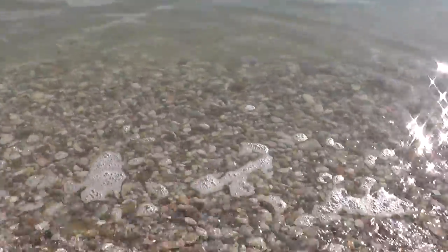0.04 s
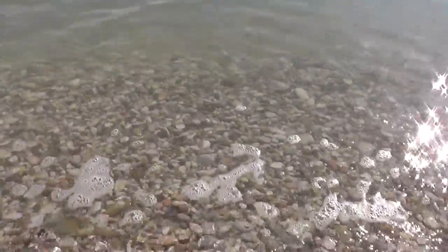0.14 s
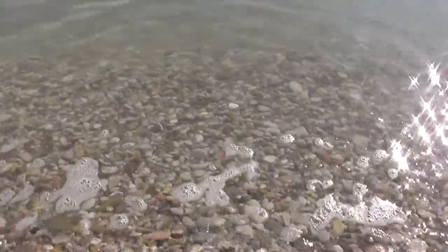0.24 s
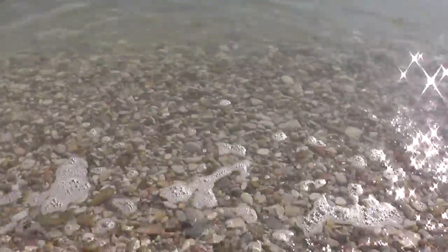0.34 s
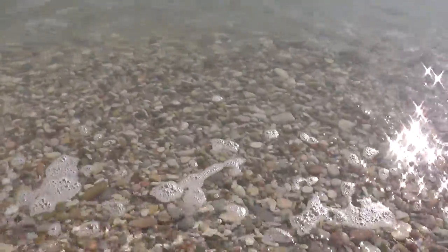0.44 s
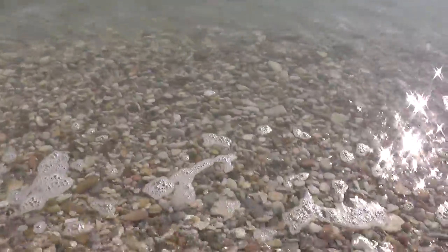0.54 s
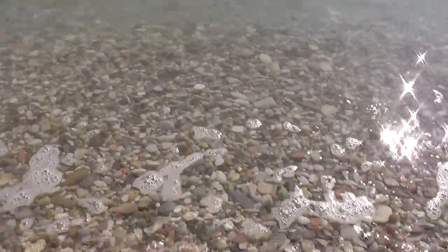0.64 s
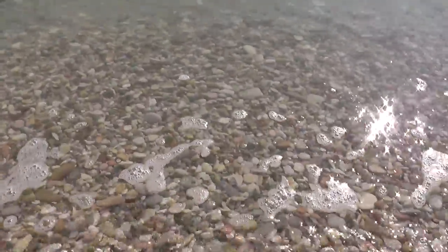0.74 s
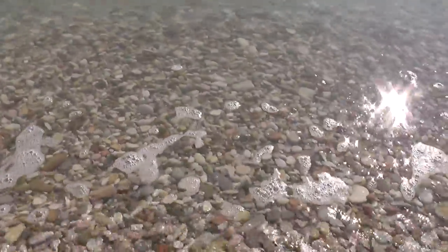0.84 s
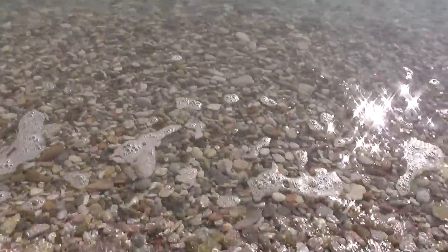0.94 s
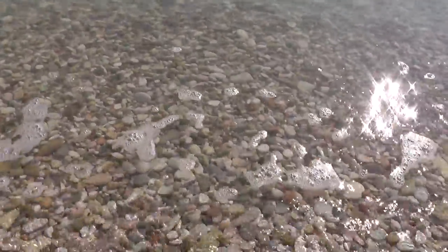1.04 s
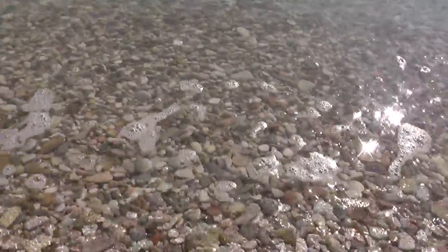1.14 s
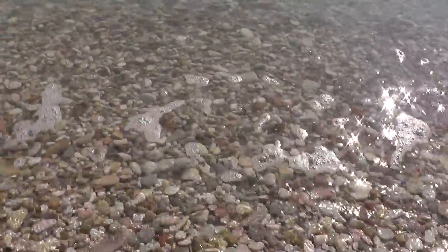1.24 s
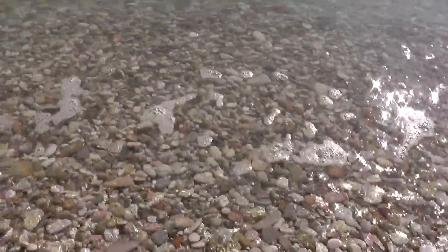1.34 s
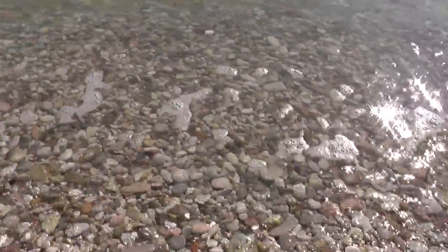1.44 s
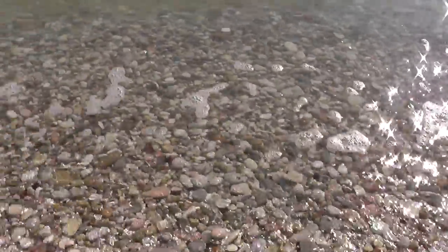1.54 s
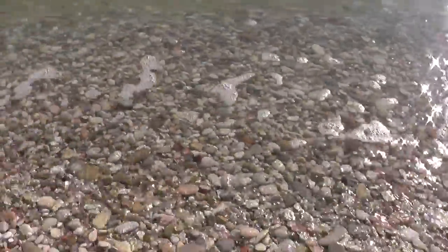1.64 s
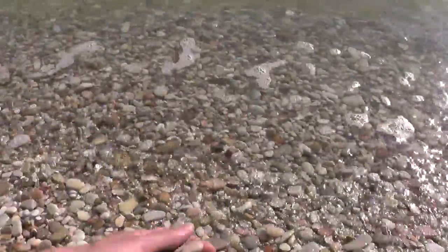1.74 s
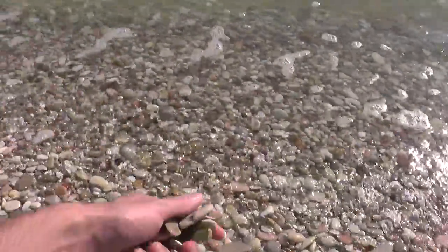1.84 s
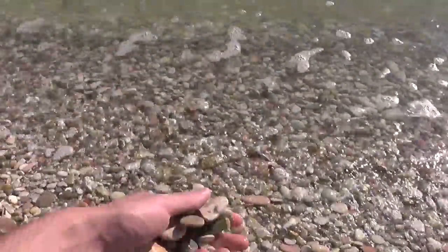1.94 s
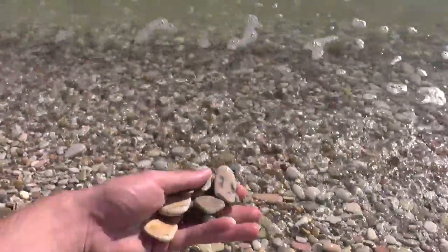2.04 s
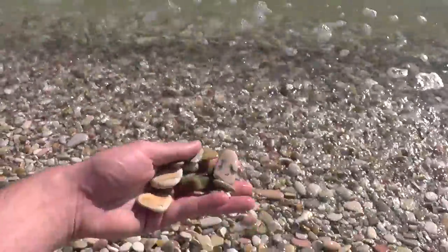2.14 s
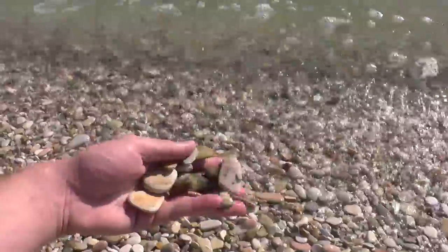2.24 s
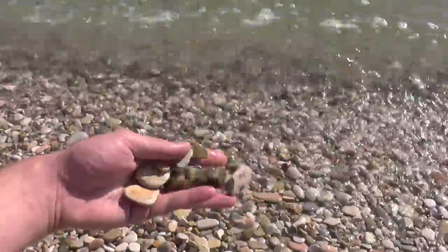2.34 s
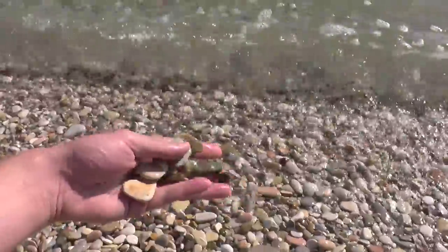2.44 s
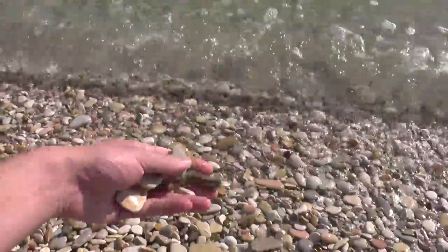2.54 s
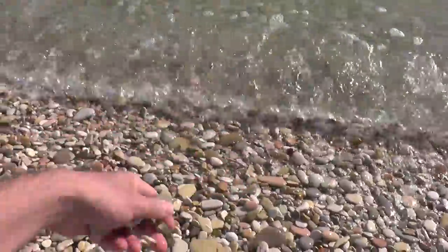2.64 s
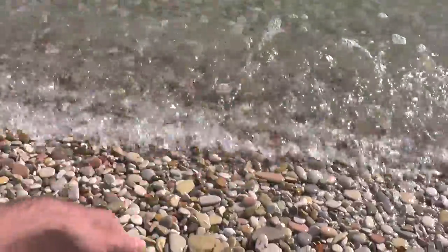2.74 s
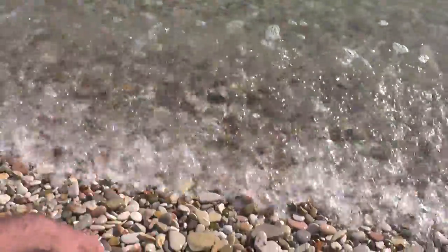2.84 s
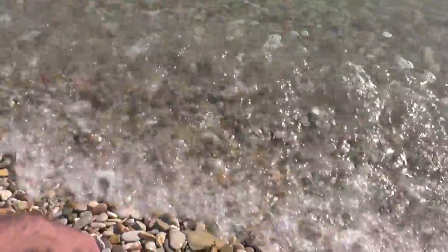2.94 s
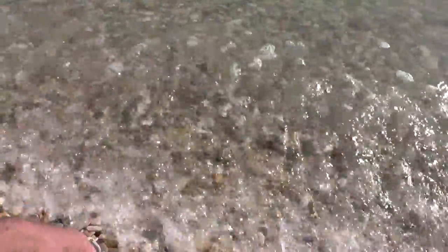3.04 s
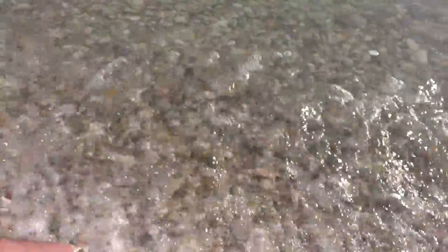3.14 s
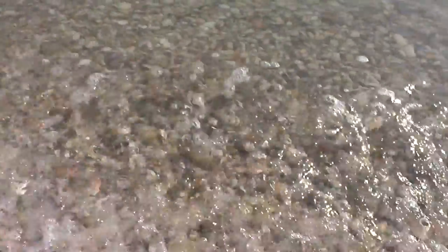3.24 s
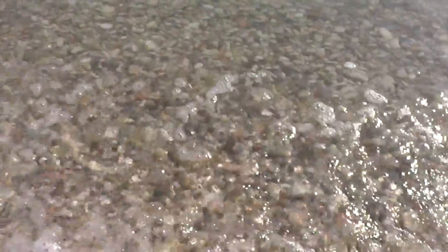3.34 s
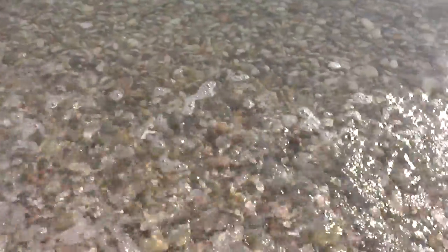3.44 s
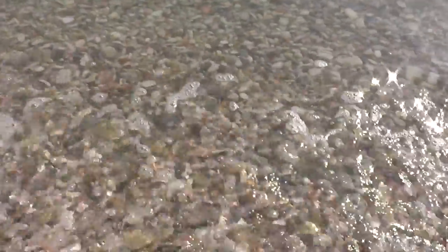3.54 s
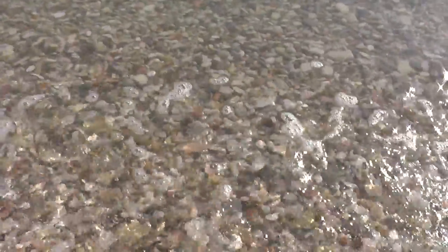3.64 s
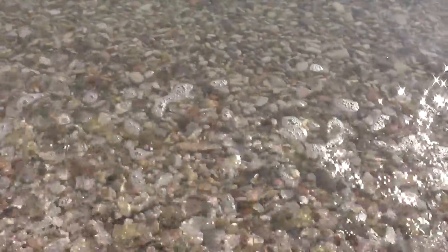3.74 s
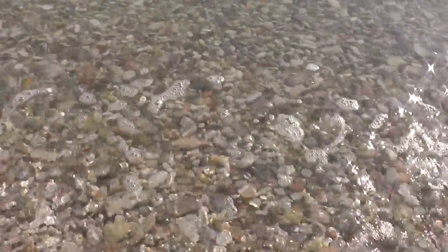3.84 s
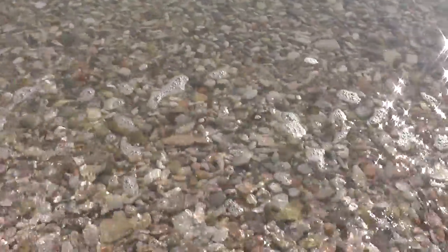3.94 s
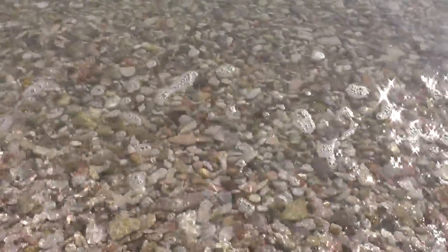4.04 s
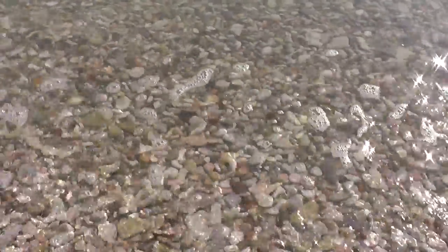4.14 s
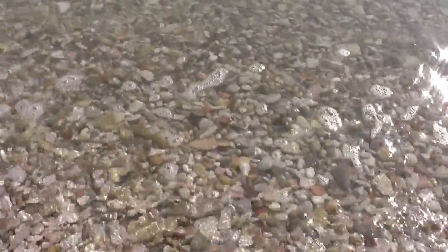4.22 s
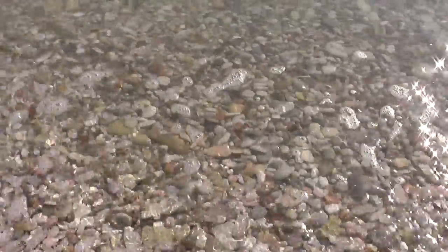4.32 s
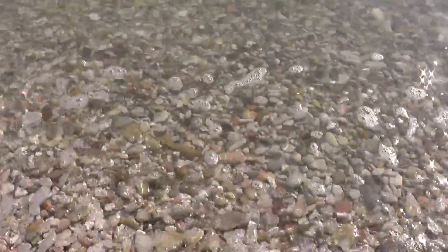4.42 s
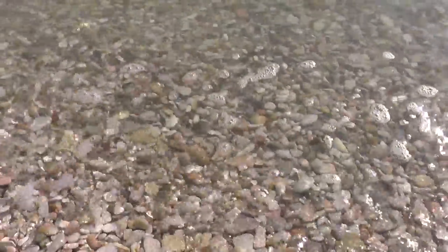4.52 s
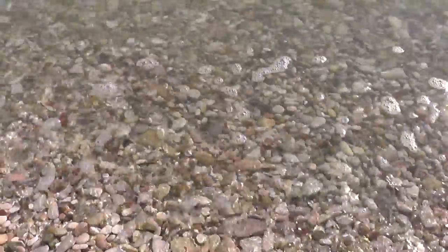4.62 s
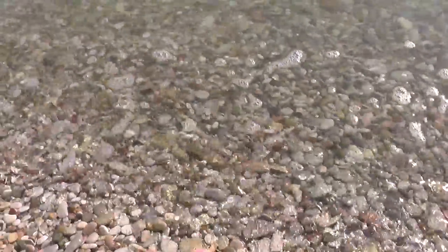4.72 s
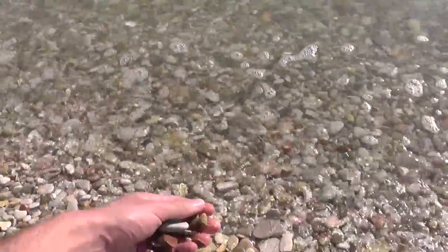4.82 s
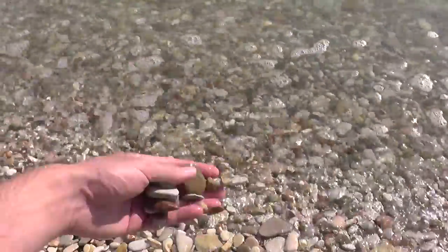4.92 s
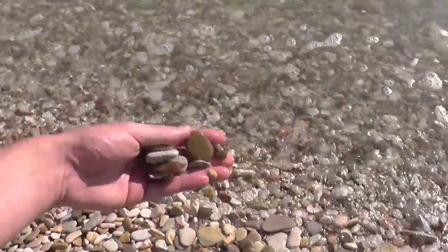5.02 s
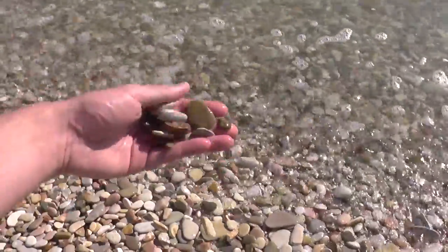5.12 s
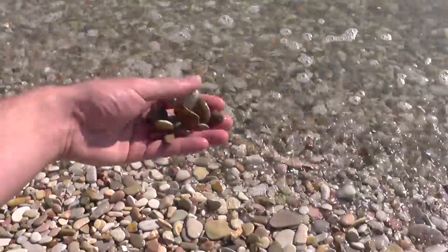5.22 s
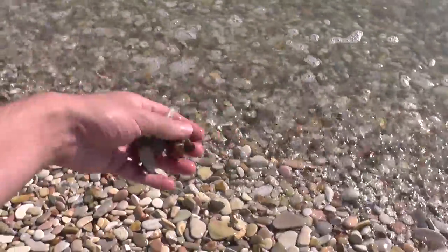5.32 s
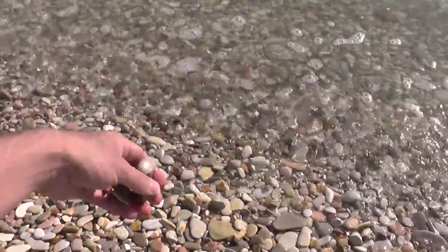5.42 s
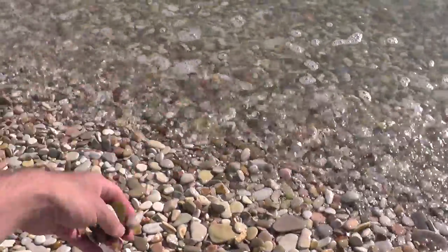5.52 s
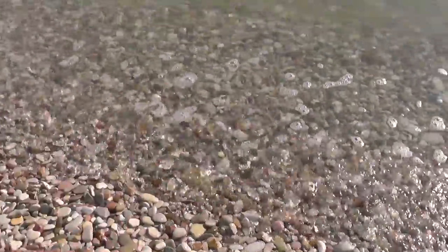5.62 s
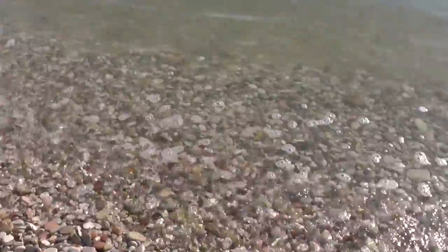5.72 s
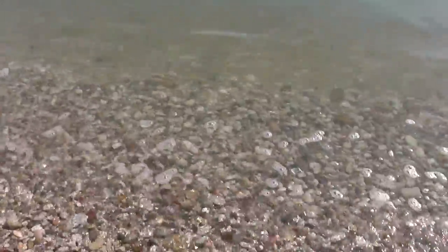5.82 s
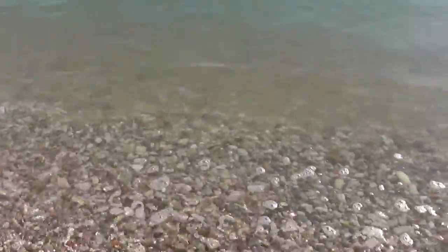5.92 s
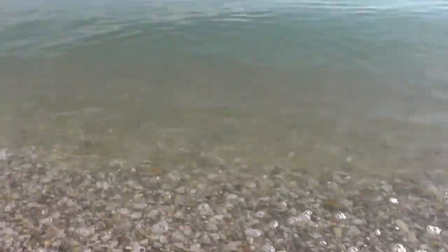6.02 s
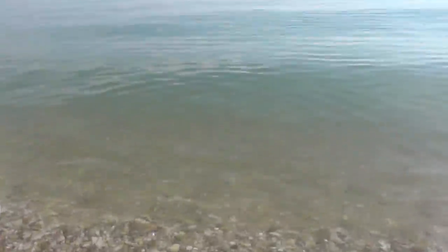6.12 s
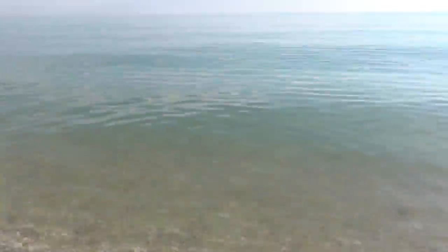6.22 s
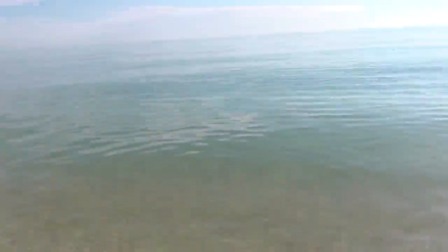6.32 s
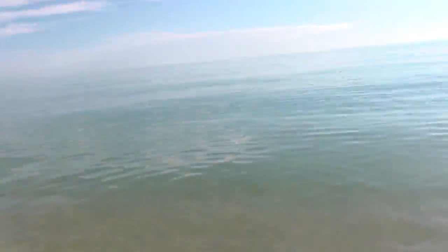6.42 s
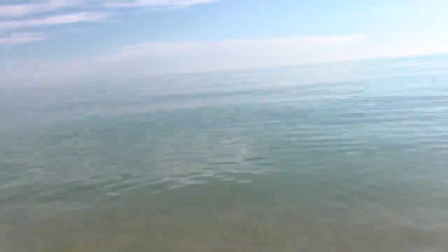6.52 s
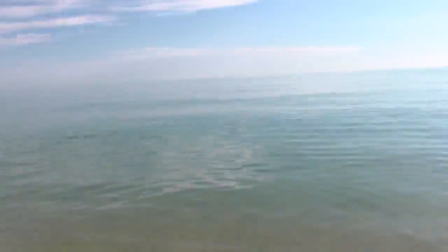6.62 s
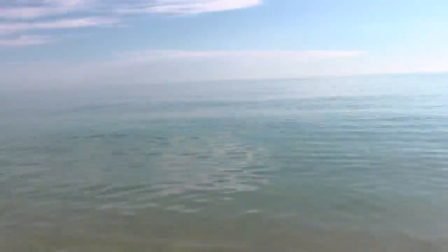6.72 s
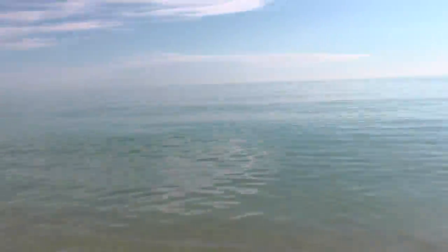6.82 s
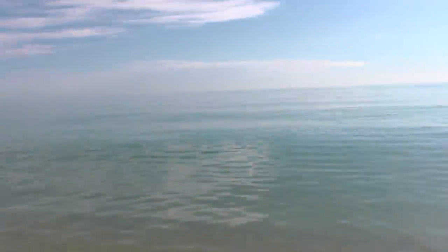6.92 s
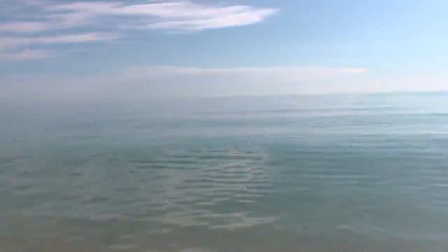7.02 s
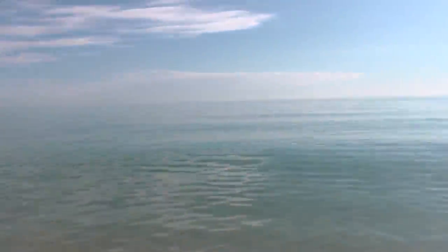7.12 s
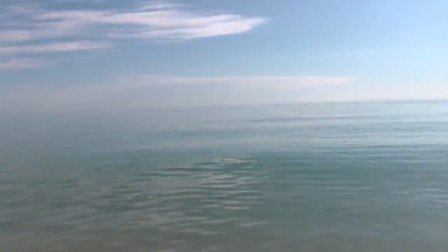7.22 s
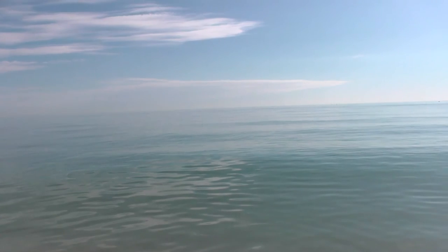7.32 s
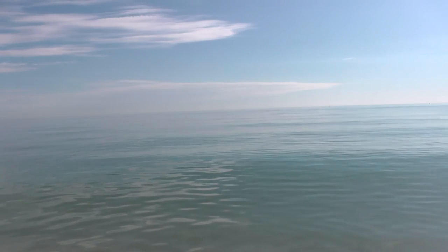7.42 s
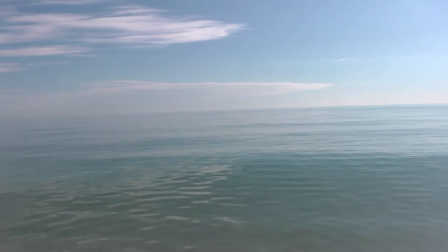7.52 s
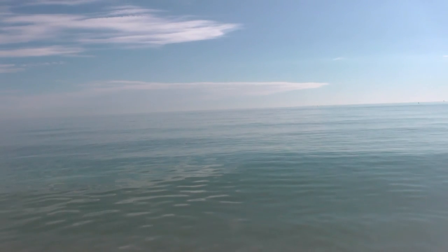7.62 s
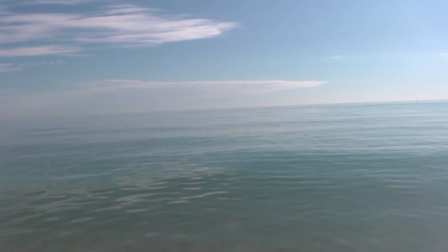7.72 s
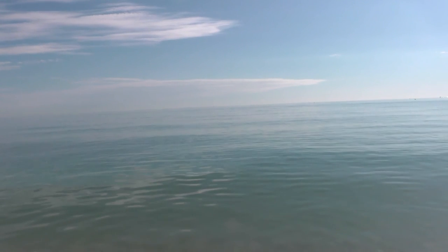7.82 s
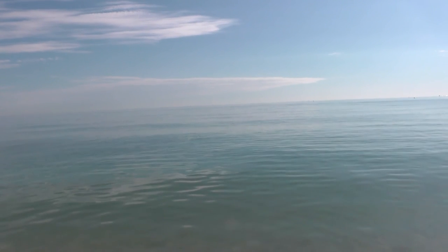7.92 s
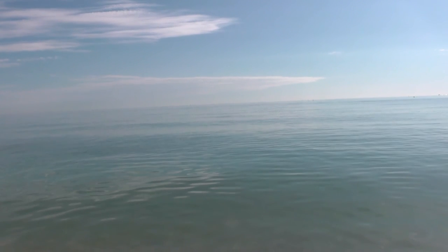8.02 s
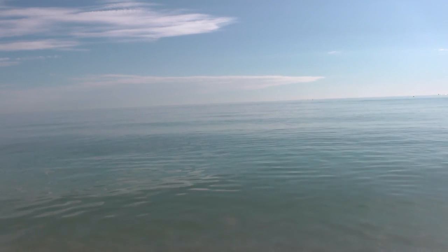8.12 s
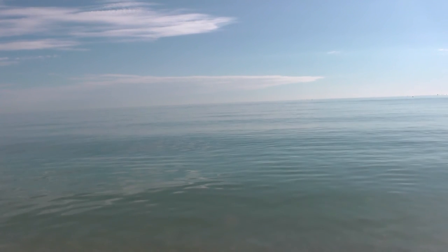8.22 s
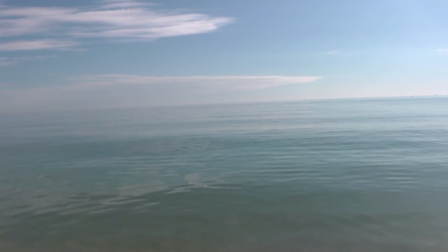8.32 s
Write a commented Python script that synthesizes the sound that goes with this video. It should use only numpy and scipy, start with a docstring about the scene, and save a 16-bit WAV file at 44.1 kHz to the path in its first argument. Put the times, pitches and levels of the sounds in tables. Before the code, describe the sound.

Small waves lap a pebble shore while handled stones crunch, click and trickle close by, followed by a lull and two splashy wavelets.

```python
"""Pebble beach with a digging hand

Small waves gulp, wash up in a cloud of rising bubbles and fade, over a steady low shore and breeze.
Close by, a hand stirs wet shingle: dense ticks slide, stones clack as damped rings, water drains between.
After a lull two last waves break in quick succession, the first to the left, the second right of centre.
Bubbles are short damped sines laid over filtered noise; contacts are noise bursts and ringing modes."""
import sys
import numpy as np
from scipy import signal
from scipy.fft import rfft, irfft, next_fast_len
from scipy.io import wavfile
from scipy.ndimage import map_coordinates

SR = 44100
rng = np.random.default_rng(int(sys.argv[2]) if len(sys.argv) > 2 else 0)


def int16_out(signal):
    """Quantize to a 16-bit WAV file."""
    q = np.round(np.clip(np.atleast_2d(signal).T, -1, 1) * 32767)
    wavfile.write(sys.argv[1], SR, q.astype(np.int16))


N = 368676
TOP_HZ = 16600  # upper band limit


def amp(db):
    """Decibels to gain."""
    return 10 ** (np.asarray(db) / 20)


def unit(x):
    """Scale to rms 1."""
    return x / np.sqrt(np.mean(x ** 2) + 1e-20)


def along(points, hz):
    """Read (Hz, value) points on a log frequency axis."""
    f, v = np.transpose(points)
    return np.interp(np.log(hz + 1), np.log(f + 1), v)


def curve(rows):
    """Join (seconds, value) rows into one value per sample."""
    s, value = np.transpose(rows)
    return np.interp(np.arange(N) / SR, s, value)


def wobble(rate):
    """A smooth random curve with rate knots a second."""
    knots = rng.standard_normal(int(N * rate / SR) + 4)
    return map_coordinates(knots, [np.arange(N) * rate / SR])


def filtered(x, response):
    """Multiply the spectrum of x by a response of frequency."""
    m = next_fast_len(N + 8192)
    return irfft(rfft(x, m) * response(np.fft.rfftfreq(m, 1 / SR)), m)[..., :N]


def coloured(x, spectrum, size=2048):
    """Minimum-phase filter: nothing sounds before its cause, so attacks stay sharp."""
    cepstrum = irfft(np.log(amp(along(spectrum, np.fft.rfftfreq(size, 1 / SR)))))
    # fold the cepstrum onto positive time
    cepstrum[1:size // 2] *= 2
    cepstrum[size // 2 + 1:] = 0
    impulse = irfft(np.exp(rfft(cepstrum)))
    return signal.oaconvolve(x, impulse[None], axes=1)[:, :N]


def spread(pair, alike):
    """Mix two unrelated signals into left and right of a given likeness."""
    def turn(hz):
        return np.arccos(np.clip(along(alike, hz), -1, 1)) / 2

    mid, side = filtered(pair, lambda hz: np.array([np.cos(turn(hz)), np.sin(turn(hz))]))
    return unit(np.array([mid + side, mid - side]))


def add(track, s, sound):
    """Mix a sound into a track at s seconds."""
    part = track[..., max(round(s * SR), 0):][..., :sound.shape[-1]]
    part += sound[..., :part.shape[-1]]


def grains(count, hz, scatter, cycles, size_db, rise, size):
    """Damped rings at random times, -60 dB after the given cycles; a middle and a side channel."""
    start = rng.integers(0, N, (count, 1))
    pitch = np.minimum(hz * np.exp(scatter * rng.standard_normal((count, 1))), SR / 3)
    strength = amp(size_db * np.minimum(rng.exponential(size=(count, 1)), 4))
    turns = pitch * np.arange(size) / SR
    age = turns / cycles
    ring = strength * amp(-60 * np.minimum(age, 2)) * np.sin(2 * np.pi * turns * (1 + rise * age))
    at = (start + np.arange(size)).ravel()
    sides = (1, rng.standard_normal((count, 1)))  # each ring gets its own direction
    return np.array([unit(np.bincount(at, (ring * side).ravel(), N)[:N]) for side in sides])


def cloud(rings, blur_db, spectrum, alike):
    """Near grains over the noise blur of countless far ones."""
    blurred = rings + amp(blur_db) * rng.standard_normal((2, N))
    return spread(coloured(blurred, spectrum), alike)


def contacts(rate, size_db, t60, size=500):
    """Sudden noise bursts, rate a second, dying in milliseconds: many faint, a few strong."""
    strength = amp(size_db * np.minimum(rng.exponential(size=N), 2.5))
    power = (rng.random(N) < rate / SR) * strength ** 2 / rate
    decay = amp(-120 * np.arange(size) / SR / t60)  # power falls 60 dB in t60
    envelope = np.sqrt(np.abs(signal.oaconvolve(power, decay)[:N]))
    return unit(envelope * rng.standard_normal((2, N)))


def swell(s, rise, hold, fade):
    """Gain that rises from time s, holds, then fades by so many dB a second."""
    t = np.arange(N) / SR - s
    return np.clip(t / rise, 0, 1) * amp(-fade * np.maximum(t - rise - hold, 0))


def together(gains):
    """Unrelated sounds add in power."""
    return np.sqrt(sum(g ** 2 for g in gains))


# Small waves on the pebbles; gulp, wash and spray get a common trim each when mixed.
# Each row: break in seconds, hold in seconds, wash fade in dB per second, gulp, wash and spray
# levels in dB before trim, left minus right in dB, gulp pitch as a ratio at the break.
WAVES = [(-0.15, 0.45, 23, -43, -36, -43.5, -5, 0.88), (0.39, 0.19, 55, -39.5, -38.5, -66, -4.5, 0.86),
         (1.129, 0.048, 22, -53, -49.5, -64, 1, 0.92), (1.9, 0.019, 40, -45, -49.5, -40.5, 0, 0.67),
         (2.402, 0.21, 28, -47.5, -48, -69, 0, 1.1), (2.702, 0.2, 45, -42.5, -36, -44, -1.5, 0.75),
         (2.905, 0.22, 21, -47.5, -36, -61, -6.5, 1), (3.469, 0.45, 36, -54, -42, -45.5, 2.5, 1),
         (4.745, 0.67, 56, -57, -57.5, -65, -2, 0.71), (7.145, 0.086, 8, -43.5, -36, -40, 6, 1.21),
         (7.531, 0.12, 21, -35.5, -29, -25, -2.5, 1.06)]
GULP_RISE_S, WASH_RISE_S, SPRAY_RISE_S = 0.073, .11, 0.16  # air pockets close first, foam and spray follow
GULP_HOLD_SHARE, GULP_FADE_DB_PER_S = 0.97, 21  # share of the wave's hold; slowest gulp fade
APPROACH_DB, APPROACH_DB_PER_S = -14.5, 19  # a wave murmurs ever louder before it breaks


def surf():
    """Left and right gains of gulp, wash and spray: each wave approaches, breaks, runs up and fades."""
    gulp, wash, spray = [], [], []
    for s, hold, fade, gulp_db, wash_db, spray_db, pan_db, _ in WAVES:
        ahead = s - np.arange(N) / SR
        approach = amp(APPROACH_DB - APPROACH_DB_PER_S * np.abs(ahead))
        approach = approach * np.clip(1 + ahead / WASH_RISE_S, 0, 1)
        gulp_fade = max(fade, GULP_FADE_DB_PER_S)
        gulp_swell = swell(s, GULP_RISE_S, GULP_HOLD_SHARE * hold, gulp_fade)
        wash_swell = swell(s, WASH_RISE_S, hold, fade)
        spray_swell = swell(s, SPRAY_RISE_S, hold, 1.3 * fade)
        sides = amp(pan_db * np.array([[.5], [-.5]]))
        gulp.append(sides * amp(gulp_db) * (1.92 * approach + gulp_swell))
        wash.append(sides * amp(wash_db) * (0.4 * approach + wash_swell))
        spray.append(sides * amp(spray_db) * (0.5 * approach + spray_swell))
    return together(gulp), together(wash), together(spray)


SHRINK_OCT_PER_S, SHRINK_FOR_S = 1.0, .42  # wash bubbles get smaller and higher; gulps rise half as fast
WASH_START_PITCH = .92  # ratio


def bubble_pitch():
    """Pitch ratios of gulp and wash: bubbles shrink as each wave runs up; the loudest wave leads."""
    weights, gulp, wash = [], [], []
    for s, hold, fade, _, wash_db, _, _, pitch in WAVES:
        shrink = 2 ** (SHRINK_OCT_PER_S * np.clip(np.arange(N) / SR - s, 0, SHRINK_FOR_S))
        power = (amp(wash_db) * swell(s, GULP_RISE_S, hold, fade)) ** 2
        weights.append(power + np.finfo(float).eps)
        gulp.append(pitch * np.sqrt(shrink))
        wash.append(WASH_START_PITCH * shrink)
    return np.average(gulp, axis=0, weights=weights), np.average(wash, axis=0, weights=weights)


def glide(pair, ratio):
    """Shift a texture in pitch by reading it at a speed that changes with time."""
    at = np.cumsum(ratio) % (N - 1)
    return np.array([map_coordinates(x, [at]) for x in pair])


# Colours of gulp, wash and spray. Each row: frequency in Hz, relative level in dB.
GULP_COLOUR = [(40, -40), (150, -11.5), (220, -2.5), (290, 1.5), (400, 1), (620, 6), (1500, -62.5)]
WASH_COLOUR = [(200, -36.5), (450, -11.5), (620, -3), (850, -4), (1300, -4), (1800, -2), (3000, -10),
               (7000, -49)]
SPRAY_COLOUR = [(1700, -6), (2300, -13.5), (2900, -5), (4500, -7.5), (5200, 0), (6500, 3), (7800, -9.5),
                (9500, 1), (10800, -6.5), (13000, -6), (16000, -34)]
# Stereo likeness of the water and the open shore. Each row: frequency in Hz, coherence from 0 to 1.
WIDE = [(130, 0.96), (280, 0.93), (700, 0.69), (1400, 0.47), (3100, 0.86), (7000, 0.31), (15000, 0.048)]
GURGLE_DB = -3.5  # single mid-sized bubbles against the dense small ones


def waves():
    """Trapped air rings, rising in pitch: large bubbles gulp, middling gurgle, small wash, spray fizzes."""
    gulp, wash, spray = surf()
    # gulp, wash and gurgle pitches here are before the glide
    large = grains(count=1200, hz=274.0, scatter=0.47, cycles=9.4, size_db=0.5, rise=0.091, size=2000)
    small = grains(count=8000, hz=1050, scatter=.45, cycles=20, size_db=3, rise=.04, size=600)
    fizz = grains(count=14000, hz=6160, scatter=0.628, cycles=19.0, size_db=3.5, rise=0.0558, size=140)
    gurgles = grains(count=1500, hz=820, scatter=.42, cycles=38, size_db=2, rise=.22, size=3000)
    gulp_pitch, wash_pitch = bubble_pitch()
    gulping = glide(cloud(large, 8.6, GULP_COLOUR, WIDE), gulp_pitch)
    bubbling = glide(cloud(small + amp(GURGLE_DB) * gurgles, 2, WASH_COLOUR, WIDE), wash_pitch)
    fizzing = cloud(fizz, 0, SPRAY_COLOUR, WIDE)
    return gulp * amp(-2.0) * gulping + wash * amp(-0.5) * bubbling + spray * amp(-2.0) * fizzing


# Stones settling in the backwash, then trickling off the hand.
# Each row: start in seconds, hold in seconds, level in dB.
SETTLING = [(-0.1, 5.3, -47.5), (5.358, 0.55, -57)]
# Slides of the shingle. Each row: start in seconds, hold in seconds, rattle level in dB.
SLIDES = [(0.139, 0.32, -39.5), (0.732, 0.22, -24.5), (1.006, 0.23, -31.5), (1.263, 0.11, -29.5),
          (1.418, 0.014, -24.5), (1.544, 0.27, -39), (1.952, 0.13, -38), (2.487, 0.27, -42.5),
          (2.794, 0.12, -34), (3.612, 0.041, -31.5), (3.883, 0.36, -31), (4.141, 0.065, -26.5),
          (4.28, 0.26, -39.5), (4.448, 0.013, -29), (4.733, 0.5, -41.5), (5.73, 0.074, -46)]
SLIDE_RISE_S, SLIDE_FADE_DB_PER_S = 0.0051, 118
# Colour of small stones ticking. Each row: frequency in Hz, relative level in dB.
SHINGLE_COLOUR = [(500, -67), (1500, -28.5), (2900, -9.5), (4500, -8.5), (5700, -5), (6800, 0.5),
                  (7800, -3), (9500, 0), (11500, -6), (13500, -13), (15000, -19), (16500, -69)]
# Stereo likeness of the near shingle. Each row: frequency in Hz, coherence from 0 to 1.
NEAR = [(1400, 0.98), (3100, 1), (6800, 0.88), (10000, 0.39), (15000, 0.3)]


def shingle():
    """Small stones tick singly when lightly touched, in a dense crunch when the heap slides."""
    stir = together(amp(db) * swell(s, SLIDE_RISE_S, hold, SLIDE_FADE_DB_PER_S)
                    for s, hold, db in SLIDES + SETTLING)
    stir_db = 20 * np.log10(stir + amp(-63.5))  # a faint floor never stops
    effort_db = np.minimum(stir_db + 28.5, 4)
    scrapes = contacts(rate=1300 * amp(0.9 * effort_db), size_db=5.5, t60=0.0075)
    ticks = grains(count=9000, hz=7470, scatter=0.253, cycles=67, size_db=5.5, rise=0, size=200)
    rattle = scrapes + 0.5 * ticks
    slips = amp(1.1 * wobble(30) + 1.9 * wobble(160))  # uneven level
    return amp(stir_db) * unit(slips * cloud(rattle, -7.5 + 0.6 * effort_db, SHINGLE_COLOUR, NEAR))


# Colour of the rest of the shore. Each row: frequency in Hz, relative level in dB.
SEA_COLOUR = [(25, -26), (70, -11), (92, 0), (120, -5), (300, -7.5), (800, -8), (1500, -17), (6000, -57),
              (16000, -49)]
# Breeze on the microphone ports. Each row: time in seconds, level in dB before a 10.5 dB lift.
BREEZE = [(0.0, -58.5), (1.3, -78), (2.09, -75), (2.82, -95), (5.21, -67), (6.0, -90), (7.1, -62),
          (8.36, -66)]
# Colour of the breeze. Each row: frequency in Hz, relative level in dB.
RUMBLE_COLOUR = [(20, -24), (48, -2), (75, 3), (130, -3), (400, -27)]


def sea():
    """The rest of the shore as steady low noise, and a breeze rumbling on each port separately."""
    shore = amp(-55.0) * spread(coloured(rng.standard_normal((2, N)), SEA_COLOUR), WIDE)
    rumble = unit(coloured(rng.standard_normal((2, N)), RUMBLE_COLOUR))
    return shore + amp(curve(BREEZE) + 10.5) * rumble


# Water draining between the stones. Each row: time in seconds, level in dB around which it flickers.
DRAIN = [(0.0, -41.5), (0.42, -38.5), (0.9, -45), (1.03, -57), (1.45, -49), (2.5, -52.5), (3.01, -42.5),
         (3.55, -47), (4.04, -38), (4.26, -51), (4.58, -49), (5.07, -42), (5.31, -55.5), (5.5, -64),
         (6.6, -72.5)]
# Colour of the trickle. Each row: frequency in Hz, relative level in dB.
TRICKLE_COLOUR = [(600, -14.5), (1400, -5.5), (2000, -1.5), (3000, 2.5), (4500, 0), (8000, -4.5),
                  (16000, -20)]


def draining():
    """Water running between the stones rings many small bubbles, at a flickering level."""
    drops = grains(count=9000, hz=2262, scatter=0.44, cycles=61, size_db=5.5, rise=0.11, size=500)
    return amp(curve(DRAIN) + wobble(32)) * cloud(drops, 4.4, TRICKLE_COLOUR, WIDE)


# Single large bubbles.
# Each row: start in seconds, level in dB before a slight lean to the right, starting pitch in Hz.
PLOPS = [(.028, -18.5, 756), (0.612, -32, 184), (0.681, -25, 234), (1.966, -31, 157), (2.01, -32, 134),
         (2.775, -32, 174), (4.724, -27, 1255), (4.798, -23.5, 885), (5.618, -31, 580), (7.177, -21.5, 316),
         (7.222, -26.5, 390), (7.575, -17, 294), (7.611, -17.5, 272.7), (8.049, -21, 331)]


def plops(cycles, rise):
    """A large pocket of air closes softly and rings upward."""
    track, t = np.zeros(N), np.arange(SR // 6) / SR
    for s, db, hz in PLOPS:
        age = hz * t / cycles
        onset = 1 - np.exp(-hz * t)
        add(track, s, amp(db - 60 * age) * onset * np.sin(2 * np.pi * hz * t * (1 + rise * age)))
    return track * amp([[-.3], [1.5]])


# Strokes of the hand through shallow water. Each row: start in seconds, level in dB before the decay.
SLOSHES = [(0.741, -33), (3.596, -31), (3.699, -31), (3.813, -31), (3.901, -25.5), (3.978, -28.5),
           (4.106, -30.5)]
# Colour of the slosh. Each row: frequency in Hz, relative level in dB.
SLOSH_COLOUR = [(480, -34), (680, -3), (1600, 2.5), (3500, 9.5), (9000, -15)]


def sloshes(attack, t60):
    """Each stroke of the hand in the water frees a short burst of bubbles and spatter."""
    strokes, t = np.zeros(N), np.arange(SR // 3) / SR
    for s, db in SLOSHES:
        add(strokes, s, amp(db - 60 * t / t60) * (1 - np.exp(-t / attack)))
    bubbles = grains(count=6000, hz=1380, scatter=0.486, cycles=34, size_db=1.0, rise=0.12, size=700)
    spatter = contacts(rate=350, size_db=5, t60=0.006)
    return strokes * cloud(bubbles + spatter, -10, SLOSH_COLOUR, WIDE)


# Large, low stones ring purely, small ones crack.
# Each row: ring in Hz, level in dB of crack and side modes over the ring.
HARDNESS = [(6100, -5.5), (7000, 3)]


def clack(ring_hz, ring_t60, high_hz, scatter, t60, crack, crack_t60, bed_db, bed_t60, side,
          count=5, size=1100):
    """One contact: the stone's main ring, shorter-wave side modes, a crack, and scatter off the pebbles."""
    t = np.arange(size) / SR
    main = amp(-60 * t / ring_t60) * np.sin(2 * np.pi * ring_hz * t)
    hz = np.minimum(high_hz * np.exp(scatter * rng.standard_normal((count, 1))), TOP_HZ)
    modes = rng.standard_normal((count, 1)) * amp(-60 * t / t60)
    lag = side * rng.standard_normal((count, 1)) * hz / ring_hz  # high modes reach the two ports less alike
    high = np.array([(modes * np.sin(2 * np.pi * hz * t + way * lag)).sum(0) for way in (1, -1)])
    snap = rng.standard_normal(size) * amp(-60 * t / crack_t60)
    bed = rng.standard_normal((2, size)) * amp(-60 * t / bed_t60)
    bright = amp(along(HARDNESS, ring_hz)) * (unit(high) + crack * unit(snap))
    return unit(unit(main) + bright + amp(bed_db) * unit(bed))


# Handfuls of loose stones knocking together.
# Each row: start in seconds, length in seconds, knocks a second, typical level in dB before the clack trim.
TUMBLES = [(0.758, 1.04, 38.8, -35.5), (1.939, 0.12, 27, -29), (3.598, 1.055, 31.6, -33.5),
           (4.469, 0.062, 98, -29.5), (4.749, .42, 30, -43.5), (5.328, .66, 37.7, -39.5),
           (5.982, 0.4, 33, -41)]
TUMBLE_SCATTER_DB = 3


def tumbles():
    """Draw the unevenly spaced knocks inside each handful, as rows like those of the single clacks."""
    rows = []
    for start, length, rate, typical_db in TUMBLES:
        for s in np.arange(start, start + length, 1 / rate):
            when = s + rng.random() / rate
            db = typical_db + TUMBLE_SCATTER_DB * rng.standard_normal()
            rows.append((when, db, 7400 * np.exp(0.12 * rng.standard_normal())))
    return rows


# Stone hitting stone close by.
# Each row: start in seconds, level in dB before an 8 dB trim and the stone colour, ring in Hz.
CLACKS = [(0.747, -20, 6840), (0.782, -20, 7000), (0.856, -21.5, 7100), (0.895, -21.5, 7140),
          (0.981, -18, 6600), (1.072, -23.5, 6660), (1.097, -24.5, 8270), (1.27, -21, 8000),
          (1.315, -21.5, 7300), (1.43, -23, 7700), (1.52, -29.5, 6570), (1.598, -20.5, 7250),
          (1.605, -21.5, 7000), (1.677, -20.5, 7510), (1.827, -18, 6100), (1.944, -24.5, 8440),
          (1.969, -18.5, 7200), (2.036, -18.5, 7300), (2.111, -20.5, 6930), (2.238, -26, 7250),
          (2.2729, -13.5, 8440), (2.277, -24, 8740), (2.498, -17, 7600), (2.511, -23, 7760),
          (2.532, -26.5, 6860), (2.584, -19.5, 9400), (2.616, -19, 6870), (2.626, -20.5, 10200),
          (2.725, -23.5, 6900), (2.861, -18.5, 7140), (3.428, -17, 6700), (3.438, -22.5, 7150),
          (3.634, -19.5, 7110), (3.703, -22, 6800), (3.897, -21, 6650), (4.028, -22, 6780),
          (4.117, -20.5, 6600), (4.184, -23, 6840), (4.27, -22, 8400), (4.34, -24, 7170),
          (4.462, -17, 8500), (4.534, -23, 8600), (4.616, -28, 9160), (4.717, -31, 7170),
          (4.858, -19.5, 7080), (5.138, -21, 6240), (5.161, -25, 6170), (5.184, -22, 6450),
          (5.201, -18, 7770), (5.239, -21, 7360), (5.247, -15, 8400), (5.253, -15.5, 9300),
          (5.349, -35.5, 6360), (5.383, -26.5, 6670), (5.398, -32, 6350), (5.473, -32.5, 7080),
          (5.505, -23, 6840), (5.517, -23.5, 8500), (5.63, -27, 6790), (5.7, -31, 7100),
          (5.726, -16.5, 9400), (5.732, -25.5, 7100), (5.771, -23.5, 6700), (5.778, -21, 8850),
          (5.783, -23.5, 8000), (5.816, -23, 8700), (5.904, -28, 10160), (5.919, -28.5, 9000),
          (5.944, -20, 9800), (6.034, -28, 8900), (6.058, -34, 9160), (6.083, -34.5, 9000),
          (6.091, -36, 8510), (6.132, -31, 9030), (6.198, -27.5, 6800), (6.231, -33.5, 5640),
          (6.274, -40, 5600), (6.332, -20, 6900), (6.347, -25.5, 9300), (6.384, -33, 6670),
          (6.422, -35.5, 6260), (6.458, -39.5, 7210), (7.188, -35.5, 6360), (7.533, -19.5, 8740),
          (7.894, -17, 9750)]
# Dull low thumps at a few of the loudest clacks. Each row: start in seconds, level in dB before the pulse
# shape.
THUMPS = [(.982, -17), (2.497, -25), (2.582, -24), (2.614, -30), (5.202, -19.5), (5.239, -18), (5.255, -24)]
# Colour of the clacks. Each row: frequency in Hz, relative level in dB.
STONE_COLOUR = [(300, -13), (1200, -9.5), (2400, -7), (4500, 0), (6700, 4), (8000, 2), (11000, 1),
                (13500, -2), (16500, -26)]
REBOUND_S, REBOUND_LOSS_DB = .0045, 9.5  # a stone skips on: typical flight, loss at each touch


def stones(count=2):
    """Handled stones clack and settle with a faint second touch; dull low thumps sound at a few of the loudest
    clacks."""
    hits, thumps = np.zeros((2, N)), np.zeros(N)
    for s, db, hz in CLACKS + tumbles():
        for touch in range(count):
            hit = clack(hz, ring_t60=0.007, high_hz=9800, scatter=0.2, t60=0.0085, crack=1.2,
                        crack_t60=0.007, bed_db=-9, bed_t60=0.015, side=.4)
            add(hits, s, amp(db - 8.0 - REBOUND_LOSS_DB * touch) * hit)
            s = s + REBOUND_S * np.exp(.5 * rng.standard_normal())
    u = np.arange(SR // 20) / SR / 0.0005  # time in half milliseconds
    push = (1 - u / 2) * np.exp(-u / 2) * (1 - np.exp(-6 * u))  # one push and a slower rebound
    for s, db in THUMPS:
        add(thumps, s, amp(db) * push)
    return coloured(hits, STONE_COLOUR) + thumps


# Hollow bodies of larger stones. Each row: start in seconds, starting level in dB, pitch in Hz.
KNOCKS = [(0.747, -6, 2900), (1.097, -21.5, 2900), (2.2725, -21, 1090), (2.498, -26, 1500),
          (2.584, -38, 2500), (2.861, -17, 2000), (4.858, -26, 3300), (5.77, -26.5, 1002),
          (6.332, -26, 1360)]
KNOCK_CYCLES = 4.6  # cycles to fall 60 dB


def knocks():
    """The low body of a larger stone dies within a few cycles."""
    track, t = np.zeros(N), np.arange(SR // 20) / SR
    for s, db, hz in KNOCKS:
        add(track, s, amp(db - 60 * hz * t / KNOCK_CYCLES) * np.sin(2 * np.pi * hz * t))
    return track


# Brief dips of the background after some hard knocks. Each row: start in seconds, depth in dB.
DIPS = [(0.99, 6), (3.439, 4.5), (5.26, 15.5), (5.52, 7.5)]
DIP_RECOVERY_S = 0.18


def dips():
    """Gain of the background: it drops at once and recovers smoothly."""
    t = np.arange(N) / SR
    depth = sum(db * (t > s) * np.exp(-((t - s) / DIP_RECOVERY_S) ** 2) for s, db in DIPS)
    return amp(-depth)


# A hard, thin stone ringing on after some clacks.
# Each row: start in seconds, starting level in dB before a lean to the right.
PINGS = [(2.62, -9), (5.514, -10), (5.631, -21)]
PING_HZ, PING_T60_S = 13350, 0.017


def pings():
    """The thin stone's one high mode beats with its close twin."""
    track, t = np.zeros(N), np.arange(SR // 8) / SR
    for s, db in PINGS:
        hz = PING_HZ * (1 + 0.022 * rng.standard_normal((2, 1)))
        add(track, s, amp(db - 60 * t / PING_T60_S) * np.sin(2 * np.pi * hz * t).mean(0))
    return track * amp([[-1.5], [1.5]])


def scene():
    """Water, stones and the open shore."""
    background = dips() * (waves() + sea())
    near_water = draining() + sloshes(attack=0.00099, t60=0.27) + plops(cycles=15.1, rise=0.058)
    return background + near_water + shingle() + stones() + knocks() + pings()


def record(dry):
    """The recorder rounds off the highest peaks and keeps nothing above its band limit."""
    rounded = dry / (1 + (dry / .7) ** 4) ** (1 / 4)
    return filtered(rounded, lambda hz: hz < TOP_HZ)


dry = scene()
out = record(dry)
int16_out(out)
```